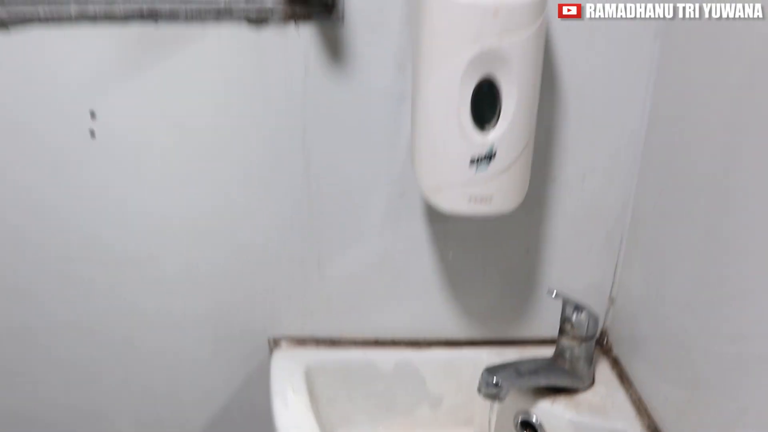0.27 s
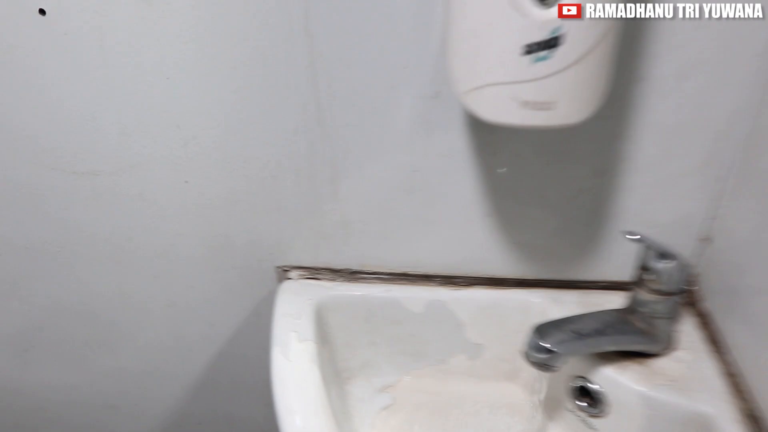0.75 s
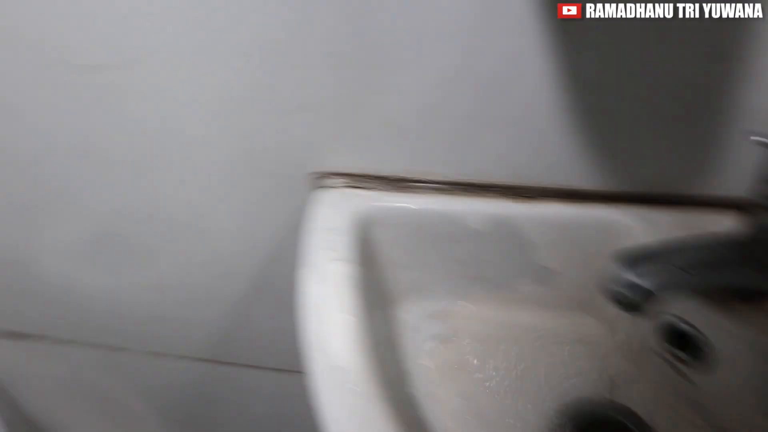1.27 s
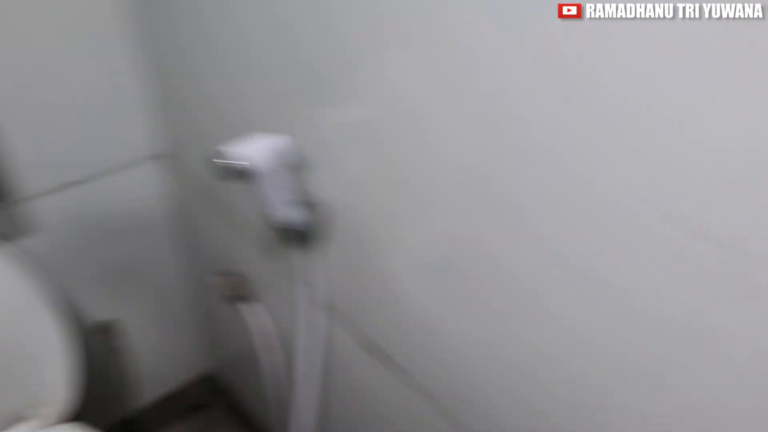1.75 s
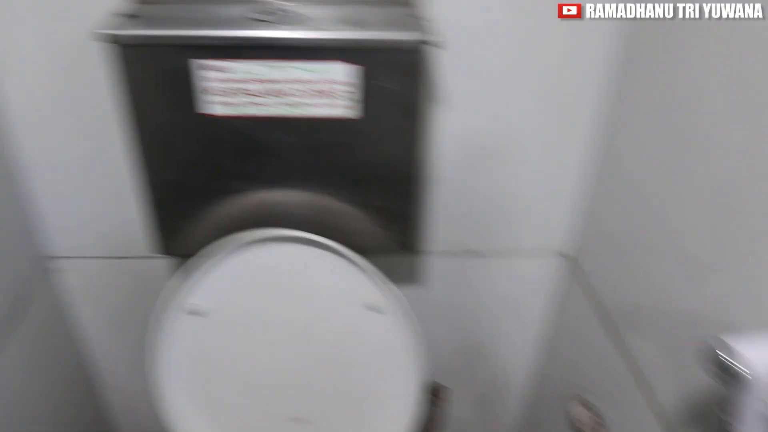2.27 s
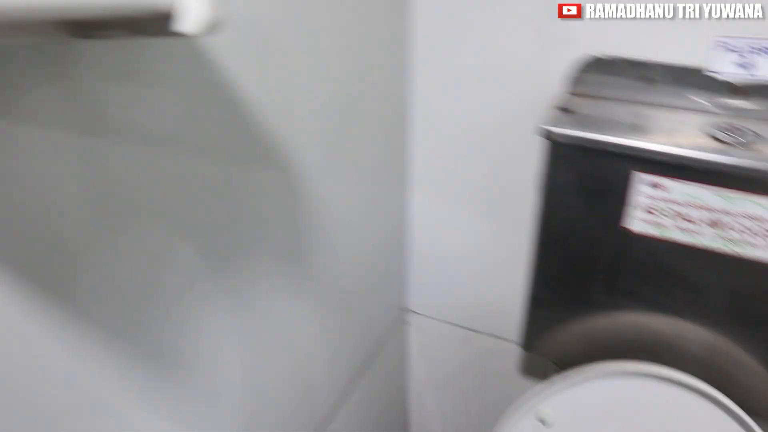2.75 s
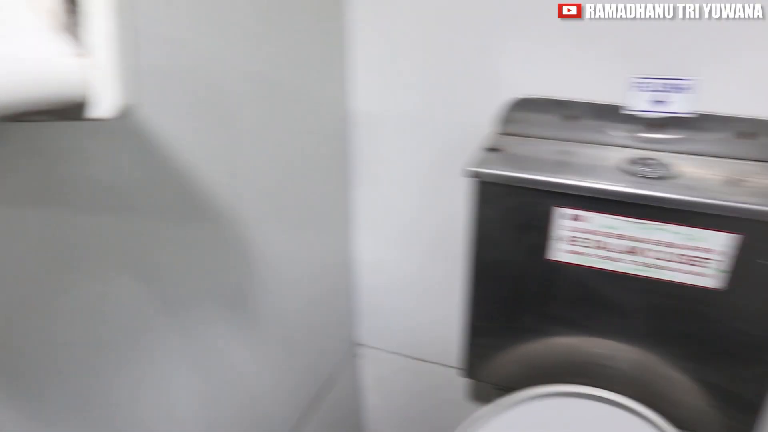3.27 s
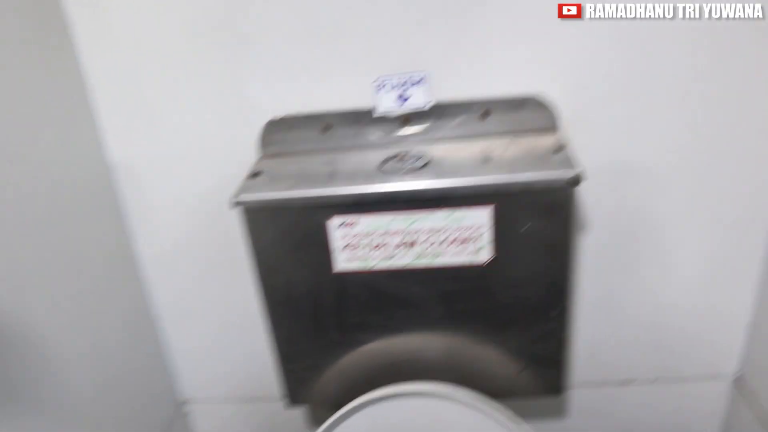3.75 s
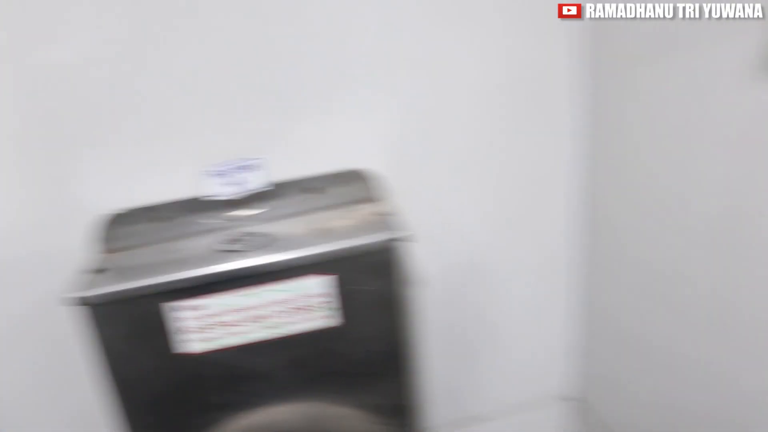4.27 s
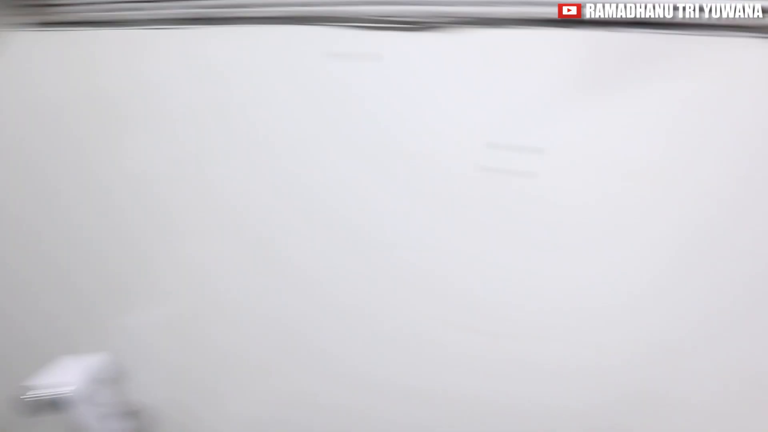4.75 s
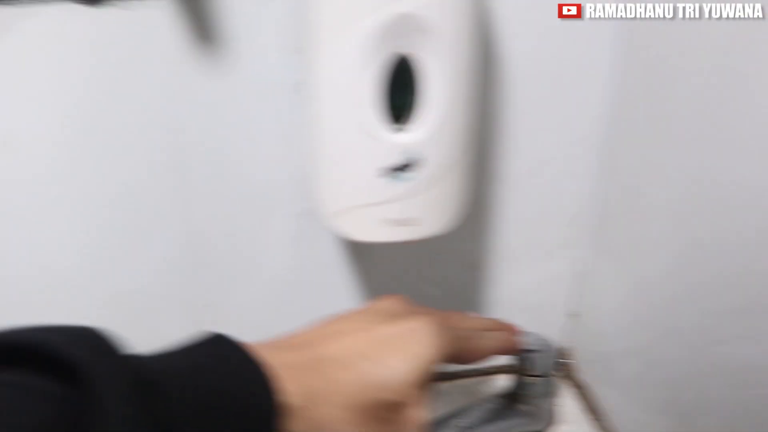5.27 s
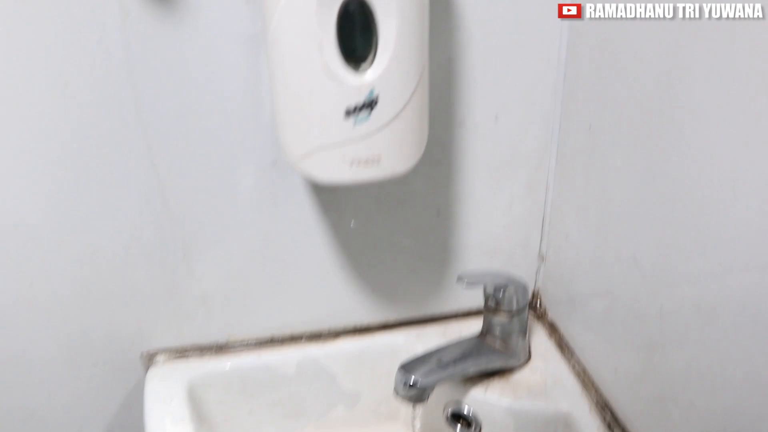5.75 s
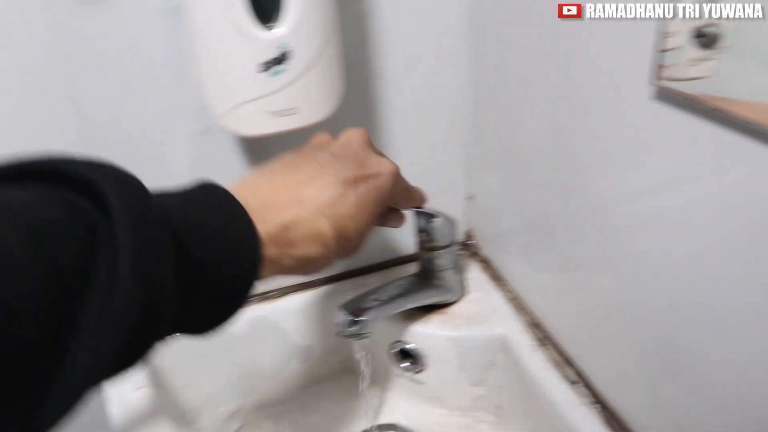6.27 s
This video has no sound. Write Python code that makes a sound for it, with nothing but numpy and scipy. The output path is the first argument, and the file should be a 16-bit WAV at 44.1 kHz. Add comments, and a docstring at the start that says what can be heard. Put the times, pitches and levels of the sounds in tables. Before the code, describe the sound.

Inside a cramped train washroom, droning machinery and rail roar continue under faint running water; a fitting cracks loudly midway, later a metal lever clicks.

```python
"""Toilet compartment of a moving train; the microphone moves from basin to bowl, then stands back.
Throughout: filtered noise for the ride and a thin tap stream, sine lines for generator and fan, rustling cloth.
First two seconds: a draught rushes at the window and jolts shake the floor; then a part jingles and another rattles.
At 3.1 s a fitting snaps loudly (noise cracks, panel modes) and gain control ducks everything for about a second.
At 5.2 s a hand knocks the tap lever, which rings and clicks; light ticks are scattered throughout."""
import sys
import numpy as np
from scipy import signal
from scipy.fft import rfft, irfft
from scipy.io import wavfile
from scipy.ndimage import uniform_filter1d, map_coordinates

SR = 44100
rng = np.random.default_rng(int(sys.argv[2]) if len(sys.argv) > 2 else 0)


def unload_audio(sound):
    """Save the sound as a 16-bit wav file, at the path given as the first command line argument."""
    columns = np.transpose(np.atleast_2d(sound))
    # keep every value between -1 and 1, then stretch to whole-number steps
    steps = np.round(np.clip(columns, -1, 1) * 32767)
    wavfile.write(sys.argv[1], SR, steps.astype(np.int16))


N = 287532
TIME, HZ = np.arange(N) / SR, np.fft.rfftfreq(N, 1 / SR)
GENERATOR_HZ, FAN_HZ = 12.502, 47.76
JOLT_TONE_HZ, JOLT_PEAK_S = 47.0, 0.033  # low tone that swells with each jolt; time from jolt onset to its peak
EDGE_HZ = 13600  # upper band limit

# Microphone path. Each row: time in seconds, place (0 over the basin, 1 at the bowl, 2 standing back).
MIC_PATH = [(0, 0.51), (1.3, 0.029), (2.2, 0.73), (3.1, 1), (3.65, 1.4), (4.2, 1.46), (5.5, 2.15),
            (6.52, 1.84)]

# Spectra of the ride. Each row: frequency in Hz, relative density in dB.
RUMBLE_SPECTRUM = [(14, -41), (22, -10), (36, 0), (50, 19), (58, 0), (72, 11), (120, -48)]
BOOM_SPECTRUM = [(40, -40), (78, -4.5), (100, 1.5), (120, 1.5), (142, 0), (165, 4), (194, -4), (212, -16.5),
                 (300, -16.5), (600, -71)]
DRONE_SPECTRUM = [(150, -1), (240, -2.5), (305, -3), (335, 0), (375, 2.5), (430, -7), (520, -8.5),
                  (700, -11), (1200, -51)]
ROAR_SPECTRUM = [(120, -4), (220, -4.5), (370, 0.5), (560, -4.5), (640, -5.5), (820, -6.5), (1000, -5),
                 (1300, -6), (1600, -9.5), (2000, -10), (3000, -18), (4800, -29), (5800, -27), (7000, -33),
                 (9000, -31.5), (10800, -44), (11800, -69), (12300, -110)]
# Steady levels of the ride. Each: level in dB over the basin, at the bowl, standing back.
RUMBLE_PLACE_DB = (-23.5, -20.5, -31.5)
BOOM_PLACE_DB = (-15, -22.5, -18)
DRONE_PLACE_DB = (-23, -25.5, -30)
ROAR_PLACE_DB = (-23, -21.5, -23.5)
# Jolts on uneven track. Each row: start in seconds, relative strength in dB.
JOLT_EVENTS = [(0.46, -13.5), (1.16, -10.5), (1.67, -12), (2.0, -15), (2.47, -23.5)]

# Hum lines. Each row: multiple of shaft speed, relative level in dB over the basin, at the bowl, standing back.
GENERATOR_LINES = [(2, -47, -53, -25), (5, -18.5, -21, -21.5), (8, -39, -21, -17.5), (10, -52, -31, -42),
                   (15, -16, -59, -28.5), (20, -27.5, -23, -35.5)]
FAN_LINES = [(1, -26, -27.5, -39), (2, -25.5, -25, -19), (4, -33, -39, -40), (5, -29.5, -32, -34),
             (9, -50, -35, -39), (10, -49, -47, -42), (11, -52, -41, -42)]
# Three clear fan tones (multiples 3, 6, 12) across standing waves. Each row: time in seconds, level in dB.
BLADE_TONE_PATH = [(0, -15.5), (.55, -18.5), (.92, -14), (1.38, -18), (1.7, -16), (2.1, -22), (2.9, -22),
                   (3.9, -20), (4.5, -21), (5.25, -19), (5.7, -17), (6.52, -18.5)]
BLADE_OCTAVE_PATH = [(0, -29), (.7, -32), (1.6, -42), (2.3, -29.5), (2.8, -24.5), (3.1, -24), (3.5, -33.5),
                     (4.25, -30.5), (4.8, -37), (5.2, -37), (5.7, -34), (6.52, -33)]
WHINE_PATH = [(0, -43), (1.4, -45), (1.9, -33), (2.25, -31.5), (2.5, -29), (2.9, -31), (3.2, -31),
              (3.55, -27), (3.75, -33), (3.92, -40), (4.1, -31.5), (4.45, -42), (4.85, -35), (5.4, -42),
              (5.85, -32.5), (6.25, -42), (6.52, -36)]

# Air at the window. Each row: frequency in Hz, relative density in dB.
DRAUGHT_SPECTRUM = [(300, -35), (550, -5), (700, 6.5), (860, -2), (1000, 1.5), (1200, -13), (2500, -41)]

# Tap stream level. Each row: time in seconds, level in dB.
WATER_PATH = [(0, -34.5), (.6, -41), (1.1, -37.5), (1.5, -39), (2.5, -41), (5.5, -46), (6.1, -43.5),
              (6.52, -59)]
# Tap stream colour. Each row: frequency in Hz, relative density in dB.
SPLASH_SPECTRUM = [(400, -29), (1500, -1), (3500, 6.5), (6000, -3), (9000, -3), (11000, -8), (12000, -44),
                   (12600, -80)]

# Sleeve rustles. Each row: crest in seconds, half length in seconds, relative level in dB.
RUSTLE_EVENTS = [(0.522, 0.15, -33), (0.956, 0.054, -30), (1.194, 0.017, -31), (1.676, 0.1, -34),
                 (1.862, 0.054, -23.5), (1.962, 0.075, -28), (2.537, 0.11, -30.5), (2.634, 0.089, -28.5),
                 (2.846, 0.061, -36), (3.45, 0.058, -31), (6.13, 0.083, -33.5), (6.295, 0.094, -28.5)]
# Cloth colour. Each row: frequency in Hz, relative density in dB.
CLOTH_SPECTRUM = [(300, -8), (1200, 8.5), (2500, 2), (4500, -2.5), (7000, -3), (9000, -2), (11300, -10),
                  (12200, -40), (12800, -80)]

# Ticks, scuffs, bumps. Each row: start in seconds, level in dB, centre in Hz, width in octaves, decay in seconds.
TICK_EVENTS = [(.168, -27, 6000, 0.35, .002), (.615, -24, 5900, 0.33, .002),
               (1.818, -20.5, 7900, 0.23, 0.013), (2.236, -12, 870, 0.6, 0.024),
               (2.357, -25, 5300, 0.16, .02), (2.555, -10, 1290, 0.27, 0.05),
               (4.737, -29.5, 6200, 0.32, .003), (4.936, -29.5, 8800, 0.16, 0.0034),
               (5.466, -37, 6000, 0.32, .003), (6.287, -23, 6370, 0.36, 0.0027)]

# Contacts of the small parts. Each row: start in seconds, relative level in dB.
RATTLE_EVENTS = [(2.622, -17), (2.6625, -9), (2.668, -7.5), (2.677, -7), (2.687, -27)]
JINGLE_EVENTS = [(2.2425, -9.5), (2.2465, -16), (2.251, -11.5), (2.2545, -9), (2.259, -14.5)]
KNOCK_EVENTS = [(5.1876, -10)]
LEVER_CLICK_EVENTS = [(5.1897, -22), (5.199, -30), (5.2515, -43)]
# Contact colours: loose part, metal on metal, lever in its play. Each row: frequency in Hz, relative density in dB.
LOOSE_PART_SPECTRUM = [(300, -17), (750, 0), (1300, 3), (2200, 1.5), (3200, -17), (4500, -19), (9000, -22),
                       (12000, -54.5)]
CONTACT_SPECTRUM = [(300, 18.5), (900, 11.5), (1400, -8), (3000, 1.5), (5000, -4), (6300, -4), (9000, 1),
                    (11000, -14), (12500, -27), (14000, -32)]
LEVER_CLICK_SPECTRUM = [(4000, -37), (7400, -11), (8000, 2), (8350, 11), (8900, -5), (10200, -9),
                        (10800, -4), (11700, -8), (12100, -15), (14000, -30)]
# Modes of the jingling part and the tap lever. Each row: frequency in Hz, relative level in dB, t60 in seconds.
JINGLE_PART_MODES = [(1700, -8, .1), (2550, -3.5, .07), (5960, -11, 0.13), (9200, -0.5, 0.095),
                     (9170, 3, 0.11), (11000, -4, .05)]
TAP_LEVER_MODES = [(167.2, 2, 0.35), (254, -9, 0.15), (330, -7, 0.13), (475, -19, .2), (1076, -8, 0.12),
                   (1129, -6, 0.14), (1206, -13, 0.13), (1836, -24, .14), (2680, -27, 0.11),
                   (6230, -12.5, .03), (7900, -24, .09), (8050, -24, 0.17), (8600, -22, 0.15)]

# The fitting's snap and chatter, the panel's thud and rebounds. Each row: start in seconds, relative level in dB.
SNAP_EVENTS = [(3.1236, -1.5), (3.1278, 3), (3.134, -4), (3.1445, -6), (3.164, -11), (3.176, -14)]
THUD_EVENTS = [(3.1252, -6), (3.1288, 1), (3.1455, -10), (3.1765, -5.5)]
# Colours of fitting and wall panel. Each row: frequency in Hz, relative density in dB.
FITTING_SPECTRUM = [(100, -22), (220, 1), (290, 13.5), (380, 8), (490, 12), (620, 3), (800, 5.5),
                    (1250, -5.5), (2250, 0.5), (2900, -3.5), (3900, -2.5), (4600, -10.5), (8500, -18),
                    (11000, -30), (13000, -46)]
PANEL_SPECTRUM = [(120, -15), (230, -9), (295, 6), (380, 0.5), (490, -1), (620, 0), (790, -3), (1000, -11),
                  (1500, -19), (4000, -58)]
# Wall panel modes. Each row: frequency in Hz, relative level in dB, t60 in seconds.
WALL_PANEL_MODES = [(289, -12, .33), (464, -20, .14), (544, -25, 0.12), (750, -25, .12), (960, -24, .2),
                    (2040, -20, .12)]

# Likeness of the two microphone ports. Each row: frequency in Hz, coherence from 0 to 1.
PORT_LIKENESS = [(150, 1), (350, .985), (630, .95), (1140, .86), (2050, .7), (3700, .3), (5500, .16),
                 (8300, .35), (11000, .5), (12000, .85)]
# Phase between the ports. Each row: frequency in Hz, lead of left over right in radians.
PORT_LEAD = [(150, 0), (500, .04), (2000, .22), (4000, .7), (6000, 1.7), (8000, 4.2), (9700, 3.3),
             (12000, 3.1)]
# Level between the ports. Each row: frequency in Hz, left minus right in dB.
PORT_BALANCE = [(500, 0), (1200, .7), (3700, 0), (6600, -1.5), (9000, -4), (12000, -1)]
# Compartment decay. Each row: frequency in Hz, t60 in seconds.
ROOM_DECAY = [(100, 0.38), (300, 0.49), (500, 0.39), (1000, 0.28), (4000, 0.24), (12000, 0.19)]


def amp(db):
    """Decibels to gain."""
    return 10 ** (np.asarray(db) / 20)


def unit(x):
    """Scales to rms 1."""
    return x / np.sqrt(np.mean(x ** 2) + 1e-20)


def read(points, hz):
    """Interpolates a frequency table on a log-frequency axis."""
    f, value = np.transpose(points)
    return np.interp(np.log(hz + 1), np.log(f + 1), value)


def follow(rows):
    """Value of a two-column time table at every sample."""
    s, value = np.transpose(rows)
    return np.interp(TIME, s, value)


def at_place(levels):
    """Level along the microphone path, from one level per place."""
    return np.interp(follow(MIC_PATH), np.arange(len(levels)), levels)


def add(mix, start_s, sound):
    """Mixes a stereo sound in at start_s."""
    part = mix[:, round(start_s * SR):][:, :sound.shape[1]]
    part += sound[:, :part.shape[1]]


def drift(rate_hz):
    """Slow random curve of rms 1, low-passed near rate_hz."""
    t = np.linspace(0, N / SR, 1024)
    f = np.fft.rfftfreq(len(t), t[1])
    spectrum = rfft(rng.standard_normal(len(t))) / (1 + (f / rate_hz) ** 4)
    return np.interp(TIME, t, unit(irfft(spectrum)))


def correlate(a, b, hz_likeness):
    """Mixes two independent spectra so that the result resembles the first by hz_likeness."""
    return hz_likeness * a + np.sqrt(1 - hz_likeness ** 2) * b


def likeness(hz):
    """Coherence of the ports at the given frequencies."""
    return np.clip(read(PORT_LIKENESS, hz), 0, 1)


def at_ports(spectrum, grain_db=0):
    """Coloured noise at the two ports; exponential grains of 32 samples make it crackle."""
    grains = np.minimum(rng.exponential(1, N // 32 + 1), 5)
    size = amp(grain_db * np.repeat(grains, 32)[:N])
    a, b = rfft(rng.standard_normal((2, N)) * size)
    tilt = amp(read(PORT_BALANCE, HZ) / 2)
    right = correlate(a, b, likeness(HZ)) * np.exp(-1j * read(PORT_LEAD, HZ))
    return unit(irfft(np.array([a * tilt, right / tilt]) * amp(read(spectrum, HZ)), N))


def panels(x, ripple_db, spacing_hz, count=5):
    """Wall-panel resonances ripple the spectrum; the sound crossfades steadily through count patterns."""
    knots_hz, spectrum, out = np.arange(0, SR / 2, spacing_hz), rfft(x), np.zeros((2, N))
    for k in range(count):
        ripple = np.interp(HZ, knots_hz, rng.standard_normal(len(knots_hz)))
        nearness = np.maximum(1 - abs(np.linspace(0, count - 1, N) - k), 0)
        out += nearness * unit(irfft(spectrum * amp(ripple_db * ripple), N))
    return out


def patchy(x, patch_db, patch_s, patch_hz):
    """Brief patches of the spectrum swell and fade at random, as in turbulence."""
    hz, t, z = signal.stft(x, SR, nperseg=512, noverlap=384)
    grid = np.array(np.meshgrid(hz / patch_hz, t / patch_s, indexing="ij"))
    field = map_coordinates(rng.standard_normal((256, 512)), grid, order=1, mode="wrap")
    patched = signal.istft(z * amp(patch_db * unit(field)), SR, nperseg=512, noverlap=384)[1]
    return unit(patched[:, :N])


def room_tail():
    """Dense echo of the hard little compartment: decaying noise, alike at both ports in the bass."""
    hz, t, (a, b) = signal.stft(rng.standard_normal((2, SR // 2)), SR, nperseg=256)
    decay = np.exp(-np.log(1000) * t / read(ROOM_DECAY, hz)[:, None])
    z = np.array([a, correlate(a, b, likeness(hz)[:, None])]) * decay
    tail = signal.istft(z, SR, nperseg=256)[1]
    return tail / np.linalg.norm(tail[0])


def blows(rows, colour_db, crack_s, wet_db, clean=False):
    """Coloured brief cracks (or clean impulses) plus room; row dB is the level over a millisecond."""
    t, out = np.arange(SR // 20) / SR, np.zeros((2, N))
    for start_s, db in rows:
        crack = rng.standard_normal((2, len(t))) * np.exp(-t / crack_s)
        if clean:
            crack = np.array([t == 0, np.zeros(len(t))])
        add(out, start_s, amp(db) * np.sqrt(SR / 1000) * crack / np.linalg.norm(crack[0]))
    a, b = rfft(out)
    # minimum phase: no sound ahead of the blow
    log_gain = np.log(unit(amp(np.maximum(colour_db, -60))))
    mirrored = np.r_[log_gain, log_gain[-2:0:-1]]
    causal = np.exp(np.conj(signal.hilbert(mirrored)))[:len(HZ)]
    direct = irfft(np.array([a, correlate(a, b, likeness(HZ))]) * causal, N)
    return direct + amp(wet_db) * signal.fftconvolve(direct[:1], room_tail(), axes=1)[:, :N]


def ringing(rows, modes, ring_db, detune, rise_s):
    """Struck modes swell and decay, each a little off pitch at every contact."""
    t, out = np.arange(SR // 3) / SR, np.zeros((2, N))
    for start_s, blow_db in rows:
        for hz, mode_db, t60_s in modes:
            lead_rad = np.array([[read(PORT_LEAD, hz)], [0]])
            side_db = read(PORT_BALANCE, hz) / 2 * np.array([[1], [-1]])
            pitch_hz = hz * (1 + detune * rng.standard_normal())
            swing = np.sin(2 * np.pi * pitch_hz * t + lead_rad)
            envelope = (1 - np.exp(-t / rise_s)) * np.exp(-np.log(1000) * t / t60_s)
            add(out, start_s, amp(blow_db + ring_db + mode_db + side_db) * envelope * swing)
    return out


def jolting():
    """Floor shaking: every jolt swells and dies away with the same shape."""
    shake = np.zeros(N)
    for start_s, db in JOLT_EVENTS:
        age = np.maximum(TIME - start_s, 0) / JOLT_PEAK_S
        shake += amp(db) * age * np.exp(1 - age)
    return shake


def ride(jolt_rumble_db=-4.0, jolt_ring_db=-1, jolt_boom_db=-7, jolt_drone_db=-12.0, flutter_db=0.46):
    """Wheels on rail: floor rumble, cabin boom, wall drone, outside roar; jolts shake the first three."""
    jolt = jolting()
    floor = np.hypot(amp(at_place(RUMBLE_PLACE_DB)), amp(jolt_rumble_db) * jolt) * at_ports(RUMBLE_SPECTRUM)
    floor += amp(jolt_ring_db) * jolt * np.sin(2 * np.pi * (JOLT_TONE_HZ * TIME + rng.random()))
    cabin = np.hypot(amp(at_place(BOOM_PLACE_DB)), amp(jolt_boom_db) * jolt) * at_ports(BOOM_SPECTRUM)
    drone = panels(at_ports(DRONE_SPECTRUM), ripple_db=1.5, spacing_hz=6.8)
    drone = patchy(drone, patch_db=0.9, patch_s=.08, patch_hz=155)
    walls = np.hypot(amp(at_place(DRONE_PLACE_DB)), amp(jolt_drone_db) * jolt) * drone
    roar = panels(at_ports(ROAR_SPECTRUM), ripple_db=2.5, spacing_hz=22.17)
    roar = patchy(roar, patch_db=1.0, patch_s=.09, patch_hz=298.4)
    outside = amp(at_place(ROAR_PLACE_DB) + flutter_db * drift(1.5)) * roar
    return floor + cabin + walls + outside


def hum(base_hz, lines, level_db, waver_db, wander_rad):
    """Multiples of a shaft speed; each varies in level with place and a slow random waver."""
    out = np.zeros(N)
    for multiple, *levels in lines:
        db = at_place(levels) + waver_db * drift(2.1)
        phase = 2 * np.pi * (multiple * base_hz * TIME + rng.random()) + wander_rad * drift(1.6)
        out += amp(db) * np.sin(phase)
    return np.sqrt(2) * amp(level_db) * out


def generator():
    """Low generator hum as lines on its shaft speed."""
    return hum(GENERATOR_HZ, GENERATOR_LINES, level_db=-3.0, waver_db=1.4, wander_rad=0.17)


def fan_tone(multiple, path, wander_rad):
    """One clear multiple of fan speed, its level following the standing wave along the path."""
    phase = 2 * np.pi * (multiple * FAN_HZ * TIME + rng.random()) + wander_rad * drift(1.8)
    return np.sqrt(2) * amp(follow(path)) * np.sin(phase)


def fan():
    """Fan hum lines plus three clear tones."""
    out = hum(FAN_HZ, FAN_LINES, level_db=-1.5, waver_db=2.0, wander_rad=0.12)
    out += fan_tone(3, BLADE_TONE_PATH, wander_rad=.08)
    out += fan_tone(6, BLADE_OCTAVE_PATH, wander_rad=.16)
    out += fan_tone(12, WHINE_PATH, wander_rad=.2)
    return out


def window(level_db=-30, reach_s=1.0):
    """Hollow draught noise, fading as the microphone leaves the window."""
    return amp(level_db) * np.exp(-(TIME / reach_s) ** 2) * at_ports(DRAUGHT_SPECTRUM)


def water():
    """Thin stream into the basin: grainy noise with brief spectral patches."""
    splash = patchy(at_ports(SPLASH_SPECTRUM, grain_db=0.5), patch_db=2.0, patch_s=.025, patch_hz=303)
    return amp(follow(WATER_PATH)) * splash


def sleeve(level_db=-1, catch_db=1.0):
    """Sliding cloth: grainy noise in soft swells, roughened by a fast random level."""
    power = np.zeros(N)
    for crest_s, half_s, db in RUSTLE_EVENTS:
        power += amp(db) ** 2 * np.exp(-((TIME - crest_s) / half_s) ** 2)
    cloth = panels(at_ports(CLOTH_SPECTRUM, grain_db=1), ripple_db=2.5, spacing_hz=132.8)
    return np.sqrt(power) * amp(level_db + catch_db * drift(36)) * cloth


def ticks():
    """Light ticks, scuffs and bumps: noise cracks, each in its own band."""
    out = np.zeros((2, N))
    for start_s, db, centre_hz, width_octaves, decay_s in TICK_EVENTS:
        colour_db = -4 * (np.log2((HZ + 1) / centre_hz) / width_octaves) ** 2
        out += blows([(start_s, db)], colour_db, crack_s=decay_s, wet_db=-2.5)
    return out


def rattle():
    """A loose part rattles dully: noise cracks weighted to the low mids."""
    return blows(RATTLE_EVENTS, read(LOOSE_PART_SPECTRUM, HZ), crack_s=0.0067, wet_db=-3)


def jingle():
    """A small metal part: contact cracks set its modes ringing."""
    out = blows(JINGLE_EVENTS, read(CONTACT_SPECTRUM, HZ), crack_s=0.0057, wet_db=2.5)
    return out + ringing(JINGLE_EVENTS, JINGLE_PART_MODES, ring_db=-13, detune=0.005, rise_s=0.00093)


def tap_lever():
    """A hand knocks the lever: contact crack, ringing modes, bright clicks in its play."""
    out = blows(KNOCK_EVENTS, read(CONTACT_SPECTRUM, HZ), crack_s=0.0044, wet_db=-1.0) * amp(-2.5)
    out += ringing(KNOCK_EVENTS, TAP_LEVER_MODES, ring_db=3.0, detune=0.0038, rise_s=0.0015)
    out += blows(LEVER_CLICK_EVENTS, read(LEVER_CLICK_SPECTRUM, HZ), crack_s=0.0033, wet_db=-2.0)
    return out


def snap():
    """The fitting snaps and chatters home; the wall panel thuds, rebounds and rings on."""
    out = blows(SNAP_EVENTS, read(FITTING_SPECTRUM, HZ), crack_s=0.005, wet_db=-4.5) * amp(-1.5)
    out += blows(THUD_EVENTS, read(PANEL_SPECTRUM, HZ), crack_s=0.001, wet_db=-3.5, clean=True)
    loudest_thud = max(THUD_EVENTS, key=lambda row: row[1])
    out += ringing([loudest_thud], WALL_PANEL_MODES, ring_db=2.0, detune=0.002, rise_s=0.0017)
    return out


def scene():
    """Ride and machinery fill the compartment; the small sounds and the snap sit on top."""
    background = ride() + generator() + fan() + window()
    return background + water() + sleeve() + ticks() + rattle() + jingle() + tap_lever() + snap()


def gain_control(x, threshold_db=-15, most_db=10.0, slope=4.2, recover_db_per_s=9.0, lag_s=0.0092,
                 fall_s=0.11, peak_db=-0.04, peak_most_db=4.0):
    """Loud bursts above the bass cut the gain far, peaks near full scale a little; it then creeps back."""
    sensed = signal.sosfilt(signal.butter(2, 400, "high", fs=SR, output="sos"), x)
    power = uniform_filter1d((sensed ** 2).mean(0), SR // 40)
    power_db = 10 * np.log10(abs(power) + 1e-12)
    burst_cut_db = np.clip(slope * (power_db - threshold_db), 0, most_db)
    level_db = 20 * np.log10(abs(x).max(0) + 1e-9)
    peak_cut_db = np.clip(2 * (level_db - peak_db), 0, peak_most_db)
    cut_db = np.maximum(burst_cut_db, peak_cut_db)
    # hold the deepest cut, released at a constant rate
    recovery_db = recover_db_per_s * TIME
    held_db = np.maximum.accumulate(cut_db + recovery_db) - recovery_db
    held_db = uniform_filter1d(held_db, int(fall_s * SR))
    return x * amp(-np.interp(TIME - lag_s - fall_s / 2, TIME, held_db))


def record(dry):
    """Gain control, a hard knee at full scale, and the band limit."""
    x = gain_control(dry)
    x = x / (1 + x ** 8) ** (1 / 8)
    low_pass = signal.firwin(255, EDGE_HZ, window=("kaiser", 9), fs=SR)
    return signal.oaconvolve(x, low_pass[None], "same")


dry = scene()
out = record(dry)
unload_audio(out)
```